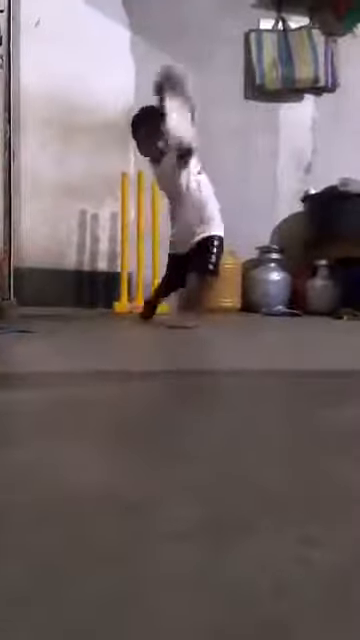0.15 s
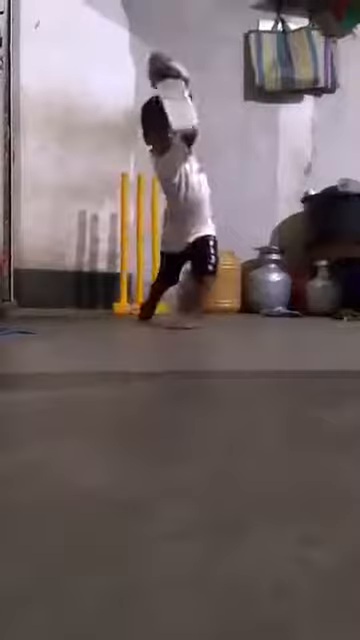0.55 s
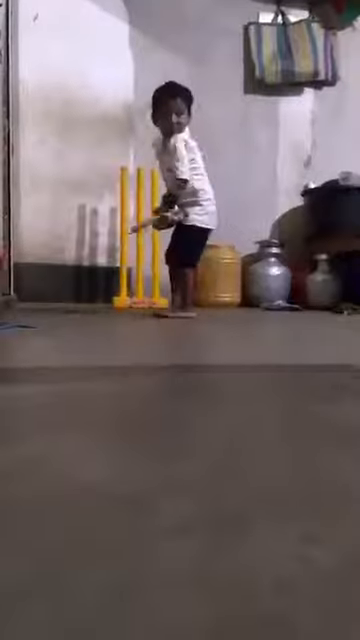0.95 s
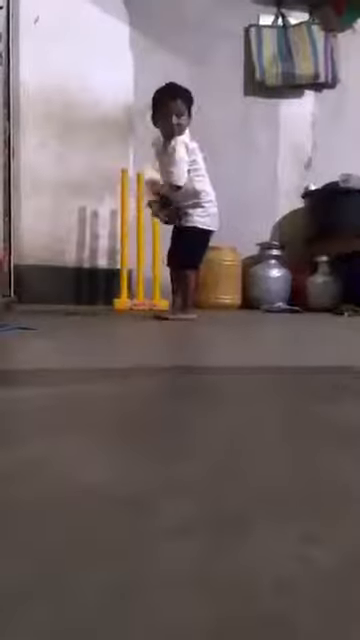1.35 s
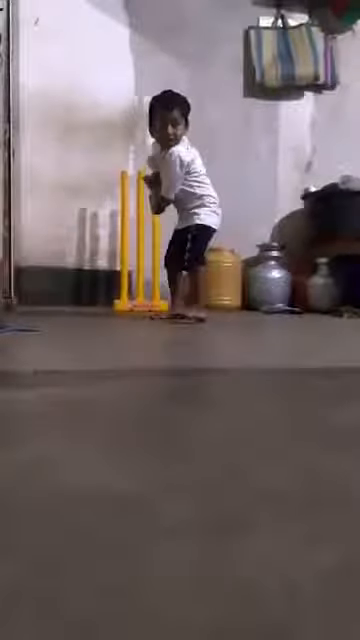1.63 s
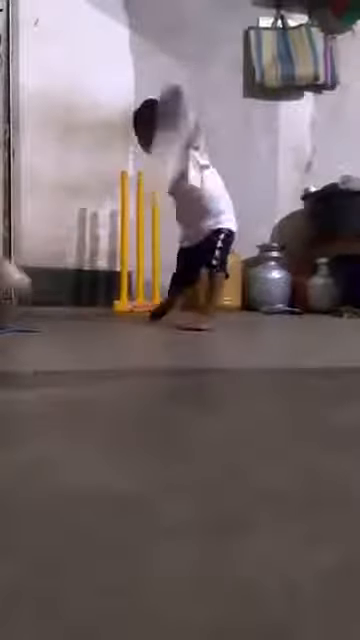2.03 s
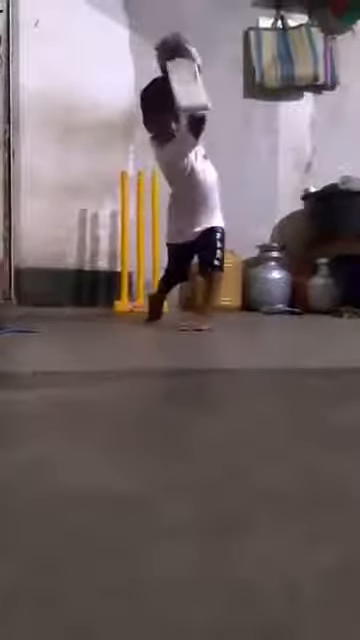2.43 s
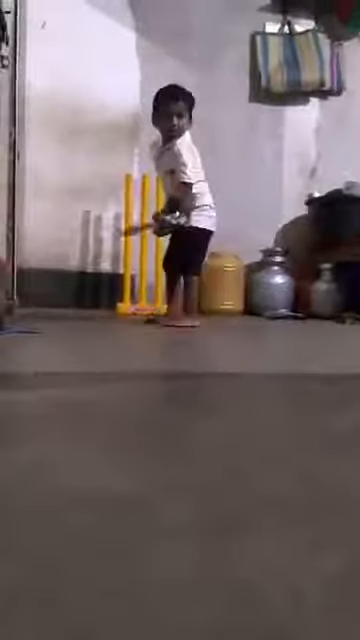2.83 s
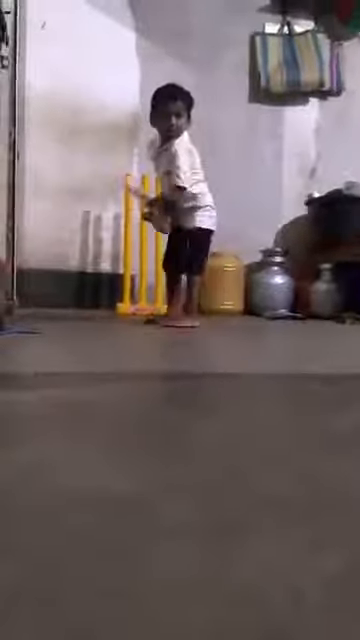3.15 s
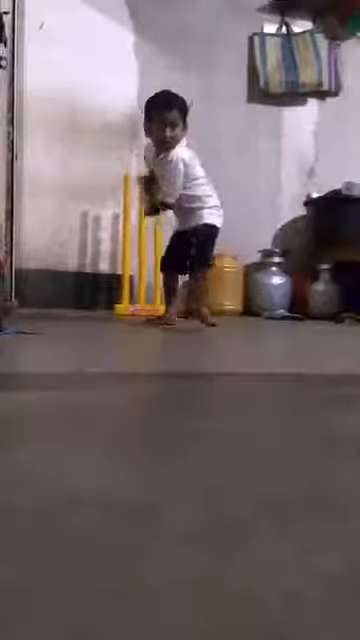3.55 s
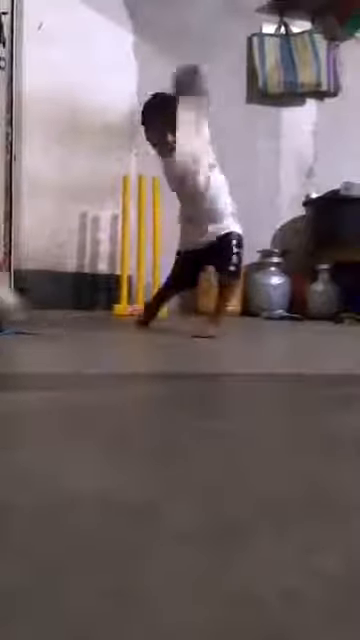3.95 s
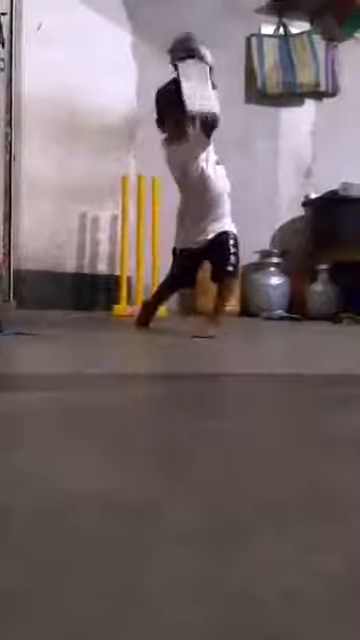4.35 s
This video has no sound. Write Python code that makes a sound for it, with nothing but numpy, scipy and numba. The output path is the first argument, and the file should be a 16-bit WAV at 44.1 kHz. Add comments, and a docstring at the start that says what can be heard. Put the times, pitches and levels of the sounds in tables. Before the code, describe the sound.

A small, bare, hard-walled room with faint steady air noise, heard in mono through a phone that squashes loud blows. At about 0.24 s a hollow plastic bat cracks, bright and ringing over a short thump; a knock follows at 0.36, another at 0.43, merging with a second sharper crack at 0.45. The ball rattles weakly from 0.5 to 0.7 while the echo fades. At 1.07 a light hollow ball bounces once, a pock with two lingering tones. Quiet follows until a third ringing crack at 2.15, then strong knocks around 2.33 to 2.5 and a dulling rattle from 2.58. A weaker crack at 2.89 is abruptly cut short, leaving a faint hollow ring from 2.96. After near-silence, the final crack comes at 4.06, with knocks at 4.19, 4.26 and 4.34, and a hollow pot struck at 4.36, humming low to the end.

```python
"""Plastic bat and light ball in a bare room

Five hard cracks of a hollow plastic bat: damped shell modes and high rings over a short thump.
A light ball knocks on walls and household things, rattles on and hits a hollow pot.
It bounces once with a pock, and later its hollow ring is left after a crack that is cut short.
Each blow is a set of modes sent through a noise-built concrete room that rings for most of a second.
Faint air noise lies beneath, and the phone's limiter flattens the loud blows.
"""
import sys
import numpy as np
from scipy import signal
from scipy.fft import rfft, irfft
from scipy.io import wavfile
from numba import njit

SR = 44100
rng = np.random.default_rng(int(sys.argv[2]) if len(sys.argv) > 2 else 0)


def pcm_store(signal):
    """Save signal as 16-bit PCM."""
    levels = np.round(np.clip(np.atleast_2d(signal), -1, 1) * 32767)
    wavfile.write(sys.argv[1], SR, levels.astype(np.int16).T)


N = 197726
SIZE = 65536  # samples in the sound of one blow
HZ = np.maximum(np.fft.rfftfreq(SIZE, 1 / SR), 1)
AGE = np.arange(SIZE) / SR  # s since the blow

# modes of the bat's plastic shell: [f/Hz, width/Hz, relative level/dB]
BAT_MODES = [(400, 270, -25.5), (786, 160, -11.5), (1402, 380, 6.5), (1734, 240, -2.5), (1976, 330, 1.5),
             (2370, 170, -8.5), (3800, 560, -21), (4300, 510, -21), (5800, 1100, -9), (7640, 130, -6.5),
             (9600, 530, -34), (10370, 1200, -11), (11290, 1300, -28.5)]
# colour of the bat's hard contact: [f/Hz, relative level/dB]
BAT_CONTACT = [(40, -24), (130, -2), (300, 5), (700, 4), (2300, 3.5), (3000, -2), (4500, 3.5), (12000, 1.5)]
# first echoes of the bat off the nearest walls: [delay/s, level in the room response/dB]
BAT_ECHOES = [(0.0133, 16.5), (0.0196, 14.5), (0.0296, 15)]
# hard plastic cracks: [t/s, level/dB, direct sound/dB, thump level/dB, shell pitch/ratio,
#                       upper ring f/Hz, lower ring level/dB, time until the sound is cut short/s]
CRACKS = [(0.2370, -16.5, -10.5, -29, 0.91, 6090, 5, 1.2), (0.4480, -13.5, -14, -19, 0.98, 6190, 18.5, 1.2),
          (2.1518, -17.5, -7, -26, 0.87, 6260, 21, 1.1), (2.8855, -24.5, -11, -32, 0.86, 5780, -10, 0.07),
          (4.055, -16, -12.5, -17.5, 0.92, 6220, -7, 1.2)]


def cracks(upper_width_hz=200, upper_db=18.5, lower_hz=4846, lower_width_hz=140, broad_db=6.5,
           cut_s=0.01, left_db=-26, thump_hz=190, thump_t60=0.036):
    """The shell's modes sound over a short thump; the spot that is struck favours two high rings."""
    out = np.zeros(N)
    thump = ring(thump_hz, thump_t60)
    for s, db, direct_db, thump_db, pitch, upper_hz, lower_db, length_s in CRACKS:
        tuned_modes = [(hz * pitch, width, mode_db) for hz, width, mode_db in BAT_MODES]
        shell = modes(tuned_modes) * colour(BAT_CONTACT)
        upper_ring = resonance(upper_hz, upper_width_hz, upper_db)
        lower_ring = resonance(lower_hz, lower_width_hz, lower_db)
        rings = undb(broad_db) + upper_ring + lower_ring
        # the sound is cut short, leaving a faint tail
        fade = np.maximum(np.exp(-np.maximum(AGE - length_s, 0) / cut_s), undb(left_db))
        crack = blow(shell * rings, db, direct_db, BAT_ECHOES) * fade
        add(out, s, crack + undb(thump_db) * thump)
    return out


# colour of a thud, shared by knocks, rattles and pot: [f/Hz, relative level/dB]
THUD = [(40, -18), (80, -28.5), (150, -9), (260, -7), (420, 1.5), (700, 1), (1300, -1), (2100, -2),
        (3200, -10.5), (5000, -18.5), (8000, -23), (12000, -25)]
# modes that colour every knock and rattle: [f/Hz, width/Hz, relative level/dB]
KNOCK_MODES = [(131, 15, 2), (381, 20, -3), (726, 120, -5), (998, 70, 3), (1200, 78, 1.5), (1640, 32, -10)]
# the ball flies into walls and things: [t/s, level/dB, direct sound/dB, bass/dB, treble/dB,
#                                        ring of the thing struck f/Hz, ring relative level/dB]
KNOCKS = [(0.3644, -13.5, -13.5, 10, 9, 1096, 7.5), (0.4300, -19, -13.5, 5, -2, 554, 10.5),
          (2.3277, -8.5, -13.5, 3.5, 6, 650, 6), (2.4117, -7, -20, -20, 1.5, 1533, 8.5),
          (2.432, -16, -10, 7.5, -16, 235.4, 13), (2.495, -18, -13, -4, 11.5, 5580, 11.5),
          (4.1891, -10.5, -23.5, 4, 4.5, 742, 3.5), (4.2550, -15.5, -13, -1, 20, 540, 14.5),
          (4.339, -13.5, -11.5, 8.5, 0.5, 1550, 11)]


def knocks(ring_width_hz=55):
    """A broad thud excites a few modes, plus one ring of whatever the ball runs into."""
    out = np.zeros(N)
    thud = colour(THUD)
    body = 1 + modes(KNOCK_MODES)
    for s, db, direct_db, bass_db, treble_db, ring_hz, ring_db in KNOCKS:
        rings = body + resonance(ring_hz, ring_width_hz, ring_db)
        add(out, s, blow(thud * rings * shelves(bass_db, treble_db), db, direct_db))
    return out


# the spent ball rattles on: [t/s, level/dB, treble/dB], all of the first rebound
RATTLES = [(0.5158, -28.5, -22), (2.5842, -19.5, -17)]


def rattles(count=3, gap_s=0.088, loss_db=4.5, dulling_db=19, direct_db=-11.5, bass_db=1):
    """The same thud repeats as the ball rebounds, losing strength and treble each time."""
    out = np.zeros(N)
    thud = colour(THUD) * (1 + modes(KNOCK_MODES))
    for s, db, treble_db in RATTLES:
        for k in range(count):
            contact = shelves(bass_db, treble_db - k * dulling_db)
            add(out, s + k * gap_s, blow(thud * contact, db - k * loss_db, direct_db))
    return out


# modes of the pot: [f/Hz, width/Hz, relative level/dB]
POT_MODES = [(290, 30, 12.5), (636, 65, 9), (766, 48, 10), (1260, 150, 11)]
# the ball hits something hollow, like a water pot: [t/s, level/dB, direct sound/dB]
POT_HITS = [(4.3560, -18.5, -10)]


def pot(bass_db=1, treble_db=-14, hum_hz=292, hum_db=-1, hum_t60=0.99):
    """A dull thud sets the pot's modes ringing, and the air inside hums on."""
    out = np.zeros(N)
    body = colour(THUD) * (1 + modes(POT_MODES)) * shelves(bass_db, treble_db)
    hum = undb(hum_db) * ring(hum_hz, hum_t60)  # level relative to the hit
    for s, db, direct_db in POT_HITS:
        add(out, s, blow(body, db, direct_db) + undb(db) * hum)
    return out


# weaker modes of the hollow ball: [f/Hz, width/Hz, relative level/dB]
BALL_MODES = [(225, 41, -5), (436, 61, -12), (639, 55, -4), (743, 90, -8), (826, 40, -23), (1114, 38, -6.5),
              (1450, 230, -4.5), (2360, 680, -12.5)]
# colour of the ball's softer contact: [f/Hz, relative level/dB]
BALL_CONTACT = [(50, -30), (200, -3), (800, 10.5), (1700, -7), (2200, -7), (4000, -20.5), (7000, -28.5),
                (13000, -58)]
# hollow ball ringing, a bounce and then a ring left after a crack:
#     [t/s, level/dB, direct sound/dB, lower shell mode f/Hz, upper shell mode f/Hz,
#      upper mode relative level/dB, lingering ring f/Hz, lingering ring level/dB, tick level/dB]
BALL_RINGS = [(1.0682, -19, -16.5, 839, 1571, 8, 893, -25.5, -26),
              (2.9580, -32, -19, 822, 1430, 4, 819, -33.5, -52)]


def ball_rings(mode_width_hz=40, lower_db=-1.5, linger_t60=0.82, upper_linger_t60=0.42,
               upper_linger_db=3, tick_s=0.00018):
    """The hollow ball rings in two strong shell modes under a tiny tick; two clear tones linger."""
    out = np.zeros(N)
    weak_modes = modes(BALL_MODES)
    for s, db, direct_db, lower_hz, upper_hz, upper_db, linger_hz, linger_db, tick_db in BALL_RINGS:
        lower_mode = resonance(lower_hz, mode_width_hz, lower_db)
        upper_mode = resonance(upper_hz, mode_width_hz, upper_db)
        shell = weak_modes + lower_mode + upper_mode
        hollow = blow(shell * colour(BALL_CONTACT), db, direct_db)
        upper_tone = undb(upper_linger_db) * ring(upper_hz, upper_linger_t60)
        tones = ring(linger_hz, linger_t60) + upper_tone
        tick = rng.standard_normal(SIZE) * np.exp(-AGE / tick_s)
        add(out, s, hollow + undb(linger_db) * tones + undb(tick_db) * tick)
    return out


# spectrum shape of the room's background noise: [f/Hz, relative level per Hz/dB]
AIR = [(18, -72), (30, -29), (90, -16), (114, -3), (271, -7), (300, -6.5), (647, -7), (699, -4), (975, -7),
       (1510, -7.5), (4300, -28.5), (11400, -48.5), (13600, -47)]


def air(level_db=-51, waver_db=1.3):
    """Faint filtered noise fills the room, its level wavering slightly."""
    hz = np.maximum(np.fft.rfftfreq(N, 1 / SR), 1)
    noise = irfft(rfft(rng.standard_normal(N)) * undb(along(AIR, hz)), N)
    steps = rng.standard_normal(size=30)
    waver = np.interp(np.arange(N), np.linspace(0, N, len(steps)), steps)
    return noise / np.std(noise) * undb(level_db + waver_db * waver)


# reverberation time of the room: [f/Hz, t60/s]
ROOM = [(100, 0.84), (250, 1), (550, 0.89), (1400, 0.85), (3500, 0.73), (6000, 0.65), (11000, 0.52)]


def room(direct_db, near_db=33, scatter_db=17, scatter_s=0.0035, echo_db=20, echo_s=0.025, build_s=0.0079):
    """Path from one spot to the phone: direct sound, scatter off the floor, wall echoes, diffuse tail."""
    noise = rng.standard_normal(SIZE)
    echoes = np.zeros(SIZE)
    delay, size = rng.random((24, 2)).T
    delay = 0.01 + .11 * delay  # s
    echoes[(delay * SR).astype(int)] = undb(echo_db) * (.5 + size) * np.exp(-delay / echo_s)
    build_up = 1 - np.exp(-AGE / build_s)
    field = rfft(noise * build_up + echoes)
    tail = 0
    # overlapping bands, each dying away at its own rate
    for (_, t60), band in zip(ROOM, np.eye(len(ROOM))):
        share = np.interp(np.log(HZ), np.log(np.array(ROOM)[:, 0]), band)
        tail = tail + irfft(field * share) * np.exp(-np.log(1000) * AGE / t60)
    near = undb(scatter_db) * noise * np.exp(-AGE / scatter_s)
    near[0] = undb(near_db)
    return tail + undb(direct_db) * near  # direct_db scales direct sound and scatter


def blow(body, db, direct_db, echoes=()):
    """A struck body's frequency response, evened in strength, sounds through the room and fades out."""
    path = room(direct_db)
    for delay_s, echo_db in echoes:
        path[int(delay_s * SR)] += undb(echo_db)
    even_body = body / np.sqrt(np.mean(abs(body) ** 2))
    sound = irfft(even_body * rfft(path))
    end_fade = np.minimum(10 * (AGE[-1] - AGE), 1) ** 2  # over the last 0.1 s
    return undb(db) * sound * end_fade


def resonance(hz, width, db):
    """Frequency response of one damped mode."""
    return undb(db) / (1 + 1j * (HZ ** 2 - hz ** 2) / (HZ * width))


def modes(table):
    """Frequency response of a set of modes."""
    return sum(resonance(*mode) for mode in table)


def ring(hz, t60):
    """A lone tone that fades by 60 dB in t60 seconds."""
    return np.sin(2 * np.pi * hz * AGE) * np.exp(-np.log(1000) * AGE / t60)


def shelves(bass_db, treble_db, bass_hz=400, treble_hz=3000):
    """A heavier contact brings more bass, a harder one more treble."""
    low = 1 / (1 + 1j * HZ / bass_hz)
    high = 1 - 1 / (1 + 1j * HZ / treble_hz)
    return (1 + (undb(bass_db) - 1) * low) * (1 + (undb(treble_db) - 1) * high)


def colour(points):
    """Causal frequency response with the given (Hz, dB) shape, by folding its cepstrum."""
    cepstrum = irfft(np.log(undb(along(points, HZ))))
    cepstrum[1:SIZE // 2] *= 2
    cepstrum[SIZE // 2 + 1:] = 0
    return np.exp(rfft(cepstrum))


def along(points, hz):
    """Read (Hz, value) points on a log-frequency axis."""
    f, value = np.transpose(points)
    return np.interp(np.log(hz), np.log(f), value)


def undb(db):
    """Decibels to gain."""
    return 10 ** (np.asarray(db) / 20)


def add(out, s, sound):
    """Mix a sound in at a time in seconds."""
    start = int(s * SR)
    out[start:start + SIZE] += sound[:N - start]


def scene():
    """Bat, ball and room, in mono."""
    return (cracks() + knocks() + rattles() + pot() + ball_rings() + air())[None]


@njit
def follow(x, attack, release):
    """Envelope that rises fast and sinks slowly."""
    out, e = np.empty(len(x)), 0.
    for i in range(len(x)):
        e += (x[i] - e) * (attack if x[i] > e else release)
        out[i] = e
    return out


def limiter(x, top_db=-4.0, attack_s=0.0018, release_s=0.018, treble_db=17, treble_hz=4500, ahead_s=0.0013):
    """Gain control that looks slightly ahead and reacts most to bright sound."""
    treble = signal.sosfilt(signal.butter(2, treble_hz, "high", fs=SR, output="sos"), x)
    loudness = abs(x) + undb(treble_db) * abs(treble)
    envelope = follow(loudness, 1 / (attack_s * SR), 1 / (release_s * SR))
    envelope = np.interp(np.arange(N) + ahead_s * SR, np.arange(N), envelope)
    return x / (1 + (envelope / undb(top_db)) ** 2) ** .5


def record(dry, gain_db=3, ceiling=0.77, low_hz=55, top_hz=12900):
    """The phone limits the blows, rounds peaks that slip through, and cuts the deep bass and the top."""
    limited = limiter(dry[0]) * undb(gain_db)
    sound = ceiling * np.tanh(limited / ceiling)
    sound = signal.sosfilt(signal.butter(2, low_hz, "high", fs=SR, output="sos"), sound)
    return signal.sosfilt(signal.ellip(8, .2, 70, top_hz, fs=SR, output="sos"), sound)[None]


dry = scene()
out = record(dry)
pcm_store(out)
```